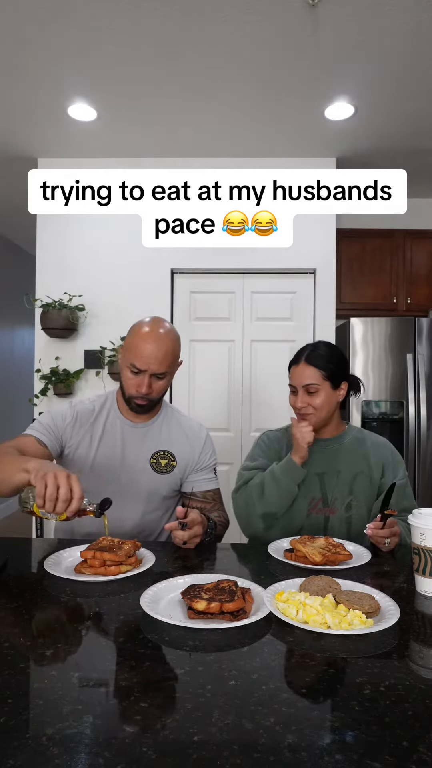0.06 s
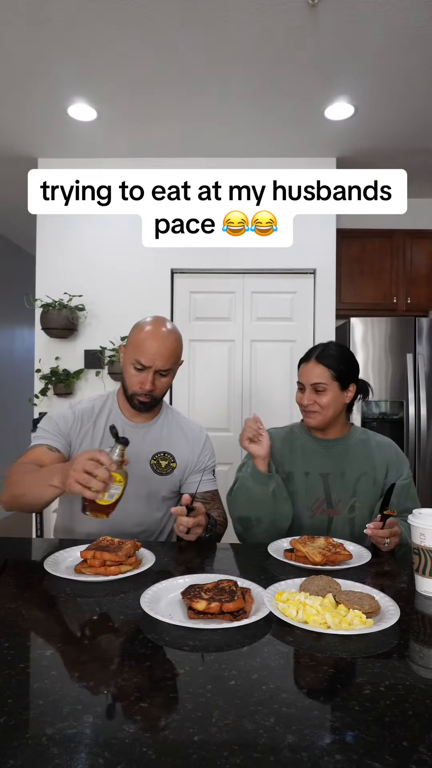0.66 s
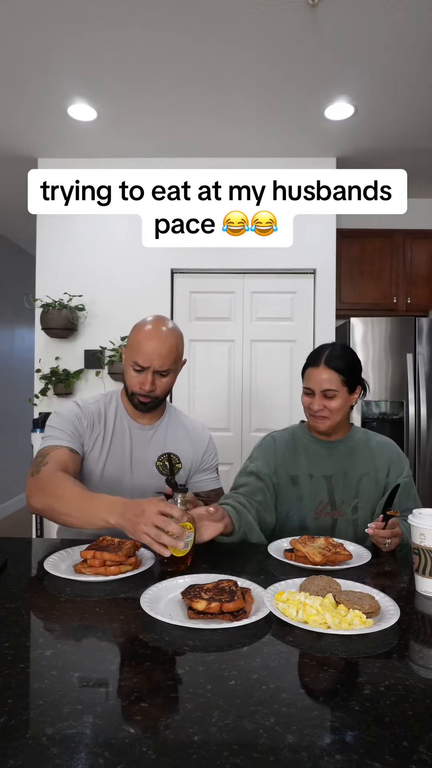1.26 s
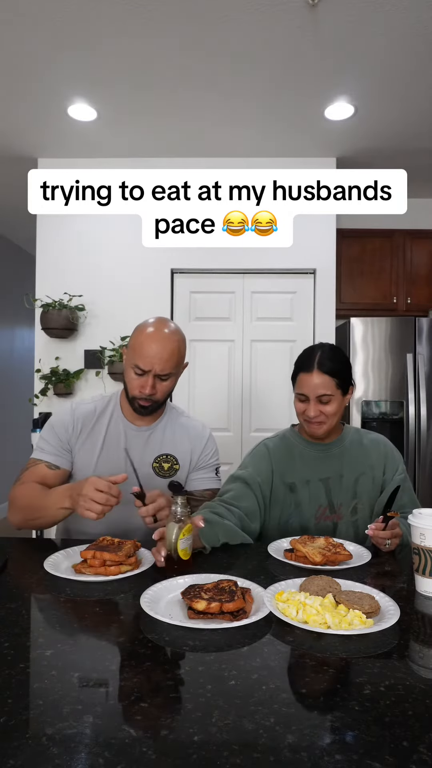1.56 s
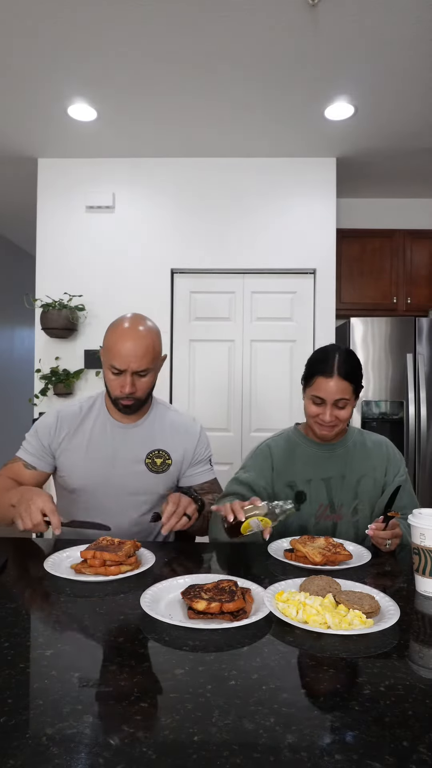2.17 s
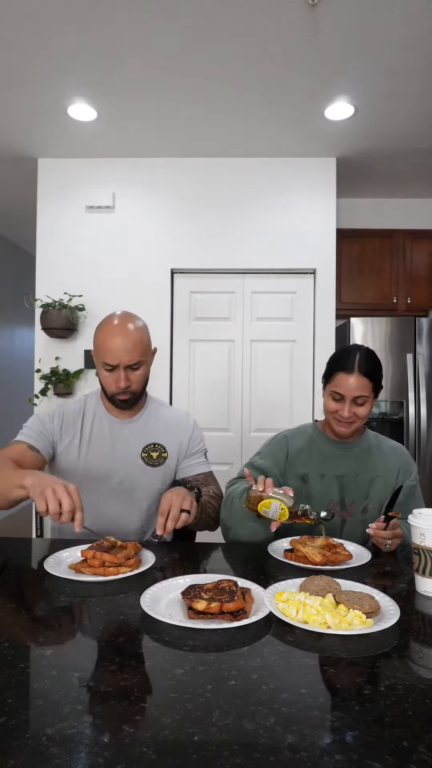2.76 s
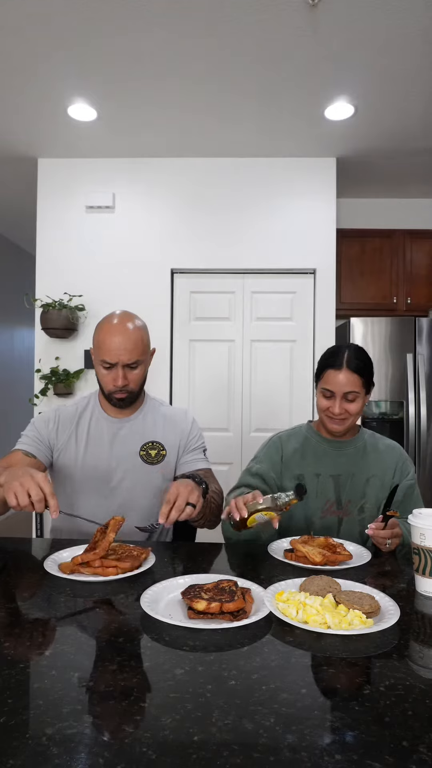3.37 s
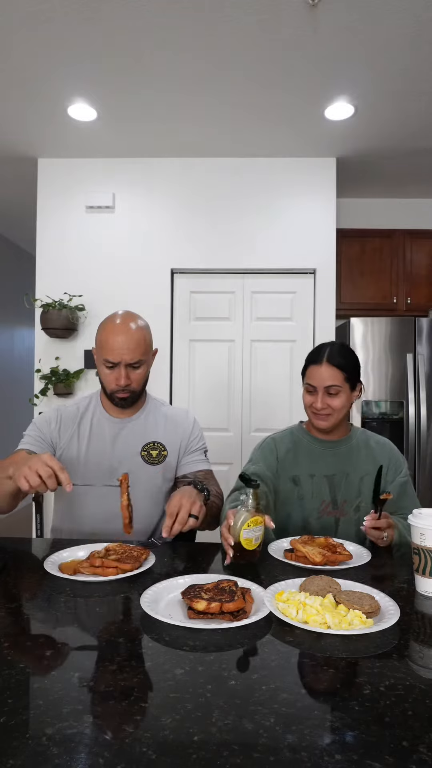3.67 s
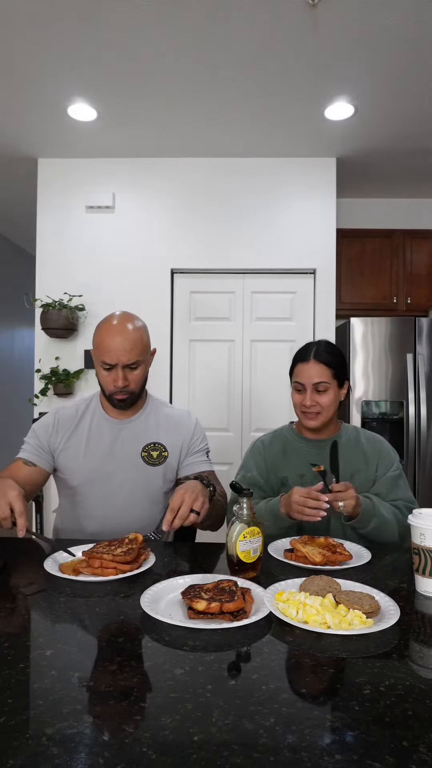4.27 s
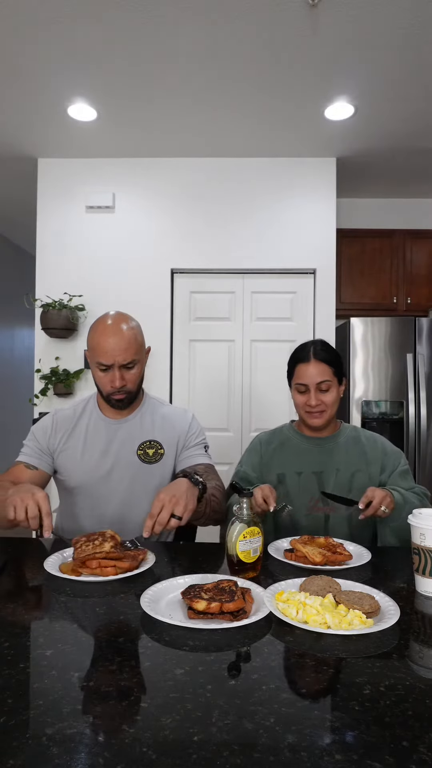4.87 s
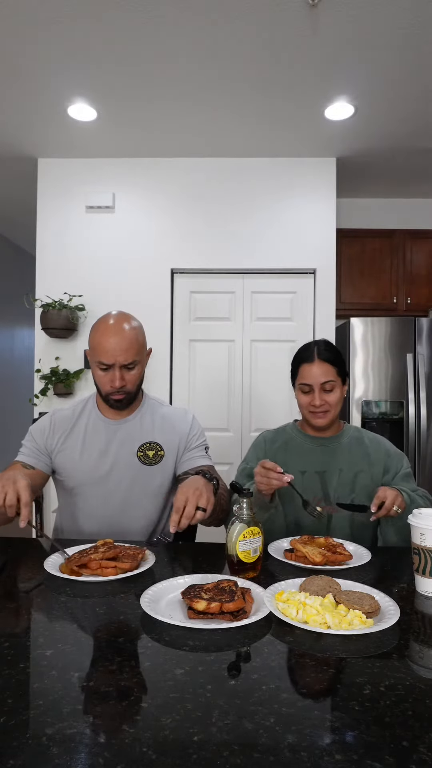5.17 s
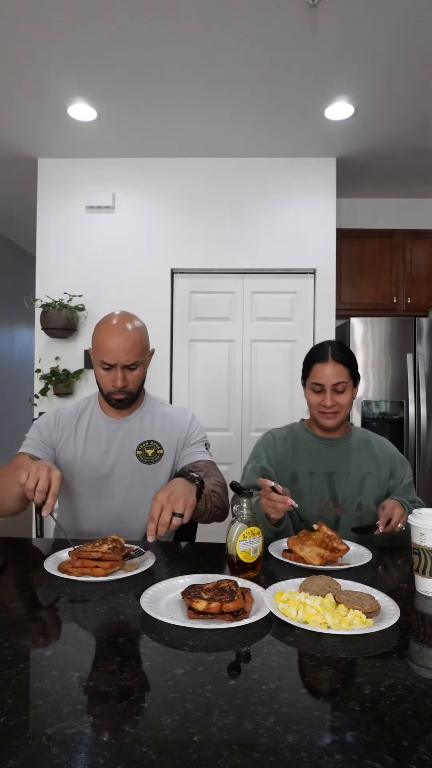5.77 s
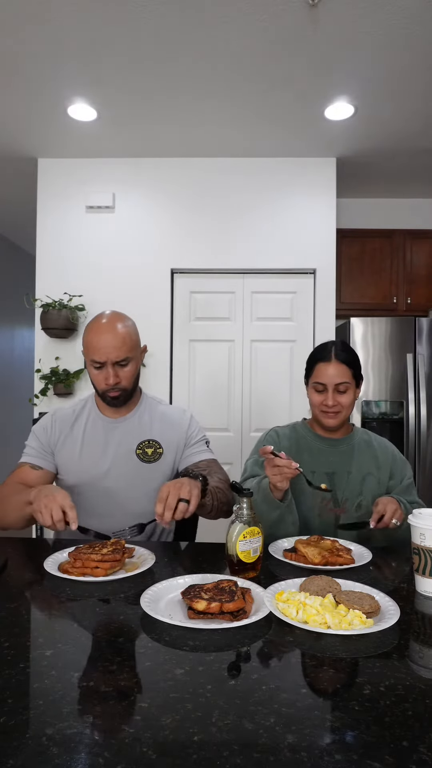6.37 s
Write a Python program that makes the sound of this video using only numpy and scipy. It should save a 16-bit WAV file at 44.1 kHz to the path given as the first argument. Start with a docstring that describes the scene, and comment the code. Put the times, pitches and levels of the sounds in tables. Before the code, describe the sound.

Knives and forks tap plates and each other between knocks of a glass bottle on a counter, over a soft appliance hum.

```python
"""A faint whistle and a few small ticks, then a glass syrup bottle knocks onto a stone counter and
judders across it in stick and slip. Air whistles softly in the spout as it pours; it lands again with
a rock. Two people are eating a step away: knife and fork rub and clink, tap food-damped plates and
saw through toast. An appliance hums under it all, and the hard kitchen gives each hit a bright tail."""
import sys
import numpy as np
from scipy import signal
from scipy.fft import rfft, irfft
from scipy.io import wavfile
from scipy.ndimage import uniform_filter1d, minimum_filter1d

SR = 44100
rng = np.random.default_rng(int(sys.argv[2]) if len(sys.argv) > 2 else 0)


def digitize_waveform(pressure):
    """Quantize a signal to 16-bit integers and store it at the path in sys.argv[1].

    Rows of a 2-D input are taken as channels; values are limited to [-1, 1].
    """
    field = np.atleast_2d(pressure).T
    bounded = np.clip(field, -1, 1)
    quanta = np.round(bounded * 32767).astype(np.int16)
    wavfile.write(sys.argv[1], SR, quanta)


N = 282681
TIME = np.arange(N) / SR

# Levels are relative, ahead of the room mix; brightness is a low-pass cutoff.
# the bottle's base lands on the stone: start_s, level_db, brightness_hz
BOTTLE_KNOCKS = [(1.1525, -9, 3080), (1.385, -6.5, 3630), (1.3955, -12, 2400), (1.4945, -14, 1270),
                 (1.554, -10, 1600), (1.574, -7.5, 3430), (1.688, -25, 1100), (1.7725, -17, 860),
                 (1.961, -35, 795), (3.8465, -11.5, 1010), (3.9245, -11.5, 1050), (3.941, -14, 1270),
                 (3.9845, -6, 4550), (3.990, -17.5, 2420), (4.008, -16, 1000)]
# shoves drag the bottle on its whole base: start_s, length_s, level_db, brightness_hz
BOTTLE_DRAGS = [(1.162, 0.086, -23, 2360), (1.383, 0.043, -23.5, 2520), (1.492, 0.019, -24, 1450),
                (1.553, 0.024, -24.5, 1610), (1.605, 0.046, -29.5, 1200), (3.852, 0.031, -34, 1160),
                (3.924, 0.04, -30.5, 1500), (3.984, .028, -23.5, 2200)]
# tilted, it skims on its rim: start_s, length_s, level_db, brightness_hz
RIM_SKIMS = [(1.675, 0.12, -31, 920)]
# the dead thud of bottle on counter: frequency_hz, level_db
THUD_SPECTRUM = [(40, -48), (110, -11.5), (220, 6), (310, -22), (450, -1.5), (900, 11), (1400, 5),
                 (2100, 2.5), (2800, -1), (3500, -9.5), (4400, -11.5), (6500, -24), (8000, -15),
                 (12000, -26), (16000, -6)]
# the ring of bottle and counter: pitch_hz, level_db, t60_s
BOTTLE_MODES = [(253, -30.5, 0.04), (421, -25.5, 0.063), (458.7, -25, 0.19), (645, -17, 0.019),
                (738, -39, 0.13), (886, -31.5, 0.027), (996, -34, 0.079), (1200, -44, 0.32),
                (1318, -21, 0.04), (1340, -24, 0.082), (1583, -23.5, 0.039), (1630, -20.5, 0.059),
                (1906, -28.5, 0.057), (1957, -27.5, 0.11), (3018, -29, 0.056), (5014, -27.5, 0.044),
                (6060, -37.5, 0.038)]
# the open cap ticks as the bottle is swung: start_s, level_db, brightness_hz
CAP_HITS = [(.6705, -51, 6400), (.7403, -51.5, 6000), (1.095, -54.5, 5050)]
# the cap's ring: pitch_hz, level_db, t60_s
CAP_MODES = [(2927, 10.5, 0.059), (4140, -4, 0.16), (4216, 1, 0.13), (6200, -4.5, 0.055)]
# air whistles through the spout during a pour: start_s, length_s, level_db, start_pitch_hz
POUR_WHISTLES = [(0, 0.07, -68, 2700), (2.549, 0.97, -70.5, 1714)]

# knife and fork tap a plate through food: start_s, level_db, brightness_hz
PLATE_TAPS = [(0.1442, -46, 6950), (1.8297, -12.5, 7350), (1.853, -40, 8100), (2.0608, -59, 5000),
              (3.353, -21.5, 2830), (3.3632, -17, 6400), (4.9306, -37, 3500), (4.993, -40, 2500),
              (5.21, -32.5, 4660), (5.4603, -28.5, 3500), (5.8542, -18.5, 8500), (6.1442, -18, 10500),
              (6.2904, -23.5, 3420), (6.311, -29, 7200), (6.3641, -29, 6360)]
# the dull click of a laden plate: frequency_hz, level_db
CLACK_SPECTRUM = [(80, -1), (250, 6.5), (600, 6.5), (950, 11.5), (1750, -3.5), (2400, 7.5), (4200, 2.5),
                  (6000, 0), (9000, -0.5), (12000, -6), (16000, -16.5)]
# the plates' ring, damped by food: pitch_hz, level_db, t60_s
PLATE_MODES = [(1010, -50, 0.012), (1393, -26, 0.038), (2350, -51, 0.039), (2540, -31, 0.024),
               (4070, -35, 0.018)]
# the knife saws through toast: start_s, length_s, level_db, brightness_hz
TOAST_CUTS = [(4.81, 0.072, -63, 12000), (4.95, 0.16, -69, 3500), (5.39, .05, -64.5, 6000),
              (5.455, 0.051, -55.5, 6500), (5.60, 0.094, -60, 4000), (6.145, 0.03, -68, 8000),
              (6.36, 0.052, -82, 4000)]
# the rasp of crumbling crust: frequency_hz, level_db
CRUST_SPECTRUM = [(40, -48), (200, -2), (700, -5), (1200, -1), (1750, -7.5), (2400, -1), (4000, -5.5),
                  (6000, -6.5), (9500, -3.5), (12000, -10), (16000, -28)]

# knife and fork strike each other: start_s, level_db, brightness_hz
STEEL_CLINKS = [(3.6717, -38.5, 13900), (3.971, -43, 15000), (4.4202, -41.5, 7450), (4.4467, -42, 7000),
                (4.492, -37.5, 5960), (4.5265, -20, 11400), (4.539, -33, 14000), (4.645, -38, 14100)]
# the crack of steel meeting steel: frequency_hz, level_db
SNAP_SPECTRUM = [(300, -98), (2000, -20), (3200, 7), (5000, -9), (9000, 3), (12000, -3), (16000, -25)]
# the ring of blade and tines: pitch_hz, level_db, t60_s
STEEL_MODES = [(3320, -4.5, 0.051), (3900, -5, 0.27), (4460, -4.5, 0.09), (4280, -1.5, 0.079),
               (4760, -11, 0.089), (4732, 6, 0.05), (5840, -15.5, 0.13), (6070, 0, 0.1), (8140, -5, 0.037),
               (7940, -0.5, 0.082), (10060, -1, 0.071), (10080, -5, 0.15), (11200, -7, .08),
               (11600, -11, .08), (11900, 1.5, 0.08), (13350, -25, .1), (14260, -4, .1), (15680, -22, .15)]
# the tines' lingering note: pitch_hz, level_db, t60_s
TINE_MODES = [(8650, 3, 0.37)]
# steel slides on steel: start_s, length_s, level_db, brightness_hz
STEEL_RUBS = [(1.66, 0.061, -47.5, 5200), (3.738, 0.033, -49.5, 9000), (3.905, 0.064, -50, 12000),
              (4.10, 0.024, -60.5, 15200)]
# the narrow squeaks of that slide: pitch_hz, level_db, width_hz
SQUEAK_BANDS = [(4226, -5, 240), (4675, -3.5, 130), (5300, 1, 360), (5960, 3, 25), (6250, -4, 150),
                (7700, -4.5, 50), (8130, -5, 36), (10000, -5, 340), (11140, -3.5, 100), (12080, 1, 100),
                (14200, -11, 110)]

# the steady air of the kitchen: frequency_hz, level_db
AIR_SPECTRUM = [(15, -49), (25, -40.5), (180, -8), (212, -2), (242, -8.5), (416, -10), (451, -13.5),
                (591, -18), (695, -20.5), (1400, -23), (2910, -29), (3620, -33), (4030, -30), (4740, -35),
                (16000, -47)]
# the appliance fan's hum: pitch_hz, level_db, width_hz
FAN_BANDS = [(210.9, -61.5, 1.65), (319.4, -65.5, 1.4), (365, -74, 16)]
# early reflections off counter, plates and people: delay_s, gain
EARLY_ECHOES = [(.0029, 0.44), (.0047, -0.2), (.0066, -0.24), (0.0116, -.2), (0.0162, -0.37)]
# how long the room's tail rings: frequency_hz, t60_s
TAIL_DECAY = [(150, 0.2), (400, .5), (1000, 0.6663), (2800, 0.7), (7000, 0.92), (14000, 0.36)]
# the tail's colour: frequency_hz, level_db
TAIL_SPECTRUM = [(150, 2), (500, -7), (1000, 1), (2000, 0.5), (5000, 2.5), (14000, -1)]
# stereo width of diffuse sound: frequency_hz, side_gain_db
STEREO_WIDTH = [(30, -29), (120, -22), (250, -19.5), (500, -13.5), (1000, -12), (2000, -8), (4000, -6),
                (14000, 0.5)]


def bottle(judder_hz=330, unevenness=0.45, spread_db=3.0, grit_db=-12):
    """Glass knocks on stone, then catches and slips as it is pushed; on its rim it loses the bass."""
    body = low_cut(ring(BOTTLE_MODES, click(THUD_SPECTRUM)), hz=78)
    catch_hz = judder_hz * np.exp(unevenness * wander(samples=120))
    catches = np.diff(np.floor(np.cumsum(catch_hz) / SR), prepend=0)  # one pulse a cycle
    catches *= amp(spread_db * rng.standard_normal(N))
    grit = amp(grit_db) * unit(slips(per_s=5000, spread_db=6.0))
    judder = signal.fftconvolve(unit(catches - catches.mean()) + grit, body)[:N]
    knocks = strike(BOTTLE_KNOCKS, body, chatter=0.76, chatter_s=0.0031)
    drags = stroke(BOTTLE_DRAGS, judder, rise=0.1, release=3.02)
    skims = stroke(RIM_SKIMS, low_cut(judder, hz=520) * rocking(), rise=0.084, release=4.84)
    return knocks + drags + skims


def rocking(rock_hz=38, depth_db=4, drift=0.196):
    """A loose tremolo: the bottle rocks on its rim, so the pressure comes and goes."""
    rate_hz = rock_hz * np.exp(drift * wander(samples=2000))
    return amp(depth_db * np.sin(2 * np.pi * np.cumsum(rate_hz) / SR))


def plates(settle_s=0.0063, settle_db=-6, settle_brightness=0.49):
    """Cutlery clacks on a laden plate, then settles with a softer, duller second touch."""
    body = low_cut(ring(PLATE_MODES, click(CLACK_SPECTRUM)), hz=116)
    settles = [(s + settle_s, db + settle_db, hz * settle_brightness) for s, db, hz in PLATE_TAPS]
    return strike(PLATE_TAPS + settles, body, chatter=1.93, chatter_s=0.0025)


def cutlery(contact_db=7, contact_t60_s=0.025, snap_db=9, tine_db=-30.5):
    """Steel on steel: a crack, a hard ring the hand damps at once, singing tines, squeaky slides."""
    free_ring = ring(STEEL_MODES, amp(snap_db) * click(SNAP_SPECTRUM))
    punch = 1 + amp(contact_db - 60 * TIME[:SR] / contact_t60_s)
    body = low_cut(free_ring * punch, hz=2350)
    tines = amp(tine_db) * strike(STEEL_CLINKS, ring(TINE_MODES), chatter=0.066, chatter_s=0.0024)
    squeak = unit(bands(slips(per_s=3500, spread_db=6.5), SQUEAK_BANDS))
    rubs = stroke(STEEL_RUBS, squeak, rise=0.65, release=2.8)
    return strike(STEEL_CLINKS, body, chatter=0.65, chatter_s=0.006) + tines + rubs


def cap():
    """Tiny ringing ticks of the cap against the bottle's neck."""
    return strike(CAP_HITS, low_cut(ring(CAP_MODES), hz=1500), chatter=1.0, chatter_s=0.008)


def toast():
    """Crust crumbles under the knife, a dry rasp with each stroke."""
    crumbs = shaped(slips(per_s=1500, spread_db=5.5), CRUST_SPECTRUM)
    return stroke(TOAST_CUTS, crumbs, rise=0.16, release=5.1)


def spout(flutter_hz=70, sag_per_s=0.2):
    """Air in the spout: a breathy whistle that swells and fades while its pitch sinks."""
    out = np.zeros(N)
    for start_s, length_s, db, hz in POUR_WHISTLES:
        progress = np.arange(0, 1, 1 / (length_s * SR))
        flutter = unit(soften(rng.standard_normal(N), flutter_hz))[:len(progress)]
        cycles = np.cumsum(hz * (1 - sag_per_s * length_s * progress)) / SR
        swell = np.sqrt(np.sin(np.pi * progress))
        add(out, start_s, amp(db) * swell * unit(flutter * np.sin(2 * np.pi * cycles)))
    return out


def room_tone(air_db=-56.5):
    """The bed: ventilation noise and the fan's wavering low tones."""
    mid, side = (amp(air_db) * unit(shaped(rng.standard_normal(N), AIR_SPECTRUM)) for _ in range(2))
    hum = bands(rng.standard_normal(N), FAN_BANDS)
    return widen(mid + hum, side)


def kitchen(dry, wet_db, early_db, pan_db):
    """Pans a source with its early reflections (positive is left) and adds the room's wide tail."""
    near = dry.copy()
    for delay_s, gain in EARLY_ECHOES:
        add(near, delay_s, amp(early_db) * gain * dry)
    far = signal.fftconvolve(dry[None], widen(tail(), tail()), axes=1)[:, :N]
    pan = amp(np.array([[pan_db], [-pan_db]]) / 2)
    return pan * near + amp(wet_db) * far


def tail(build_s=0.0067):
    """Dense wall reflections bloom quickly, each band dying at its own speed."""
    hz, t, noise = signal.stft(rng.standard_normal(SR), SR, nperseg=256)
    t60 = read(TAIL_DECAY, hz)[:, None]
    decay = amp(read(TAIL_SPECTRUM, hz)[:, None] - 60 * t / t60)
    equal_energy = np.sqrt(2 * np.log(1000) / (t60 * SR))
    bloom = 1 - np.exp(-(TIME[:SR] / build_s) ** 2)
    return signal.istft(noise * decay * equal_energy, SR, nperseg=256)[1][:SR] * bloom


def widen(mid, side):
    """Diffuse sound in stereo: nearly mono in the bass, wide in the treble."""
    side = shaped(side, STEREO_WIDTH)
    return np.array([mid + side, mid - side])


def strike(hits, body, chatter, chatter_s):
    """Plays hits on one resonant body; each contact chatters for a few milliseconds."""
    out, fade = np.zeros(N), np.exp(-TIME[:1024] / chatter_s)
    for start_s, db, brightness_hz in hits:
        force = chatter * rng.standard_normal(len(fade)) * fade / np.linalg.norm(fade)
        force[0] += 1  # the clean blow ahead of the chatter
        force /= np.linalg.norm(force)
        wave = soften(body, brightness_hz)
        add(out, start_s, amp(db) * signal.fftconvolve(wave / abs(wave).max(), force))
    return out


def stroke(strokes, friction, rise, release, db_per_octave=30):
    """Friction presses in, holds and dulls as it fades; rise and release (to -60 dB) are in lengths."""
    cutoffs_hz = np.geomspace(500, 16000, 6)
    shades = [unit(soften(friction, hz)) for hz in cutoffs_hz]
    out = np.zeros(N)
    for start_s, length_s, db, brightness_hz in strokes:
        span = slice(round(start_s * SR), round(start_s * SR) + SR)
        progress = (TIME[span] - start_s) / length_s
        fade_db = -60 * np.maximum(progress - 1, 0) / release
        cutoff_hz = brightness_hz * 2 ** (fade_db / db_per_octave)
        # crossfade between the two nearest shades of brightness
        blend = np.interp(cutoff_hz, cutoffs_hz, np.arange(len(shades)))
        rub = sum(np.sqrt(np.maximum(1 - abs(blend - k), 0)) * x[span] for k, x in enumerate(shades))
        out[span] += np.clip(progress / rise, 0, 1) * amp(db + fade_db) * rub
    return out


def ring(modes, transient=(0,)):
    """One second of a struck body: dying modes under an optional transient."""
    t = TIME[:SR]
    wave = sum((-1) ** k * amp(db - 60 * t / t60) * np.sin(2 * np.pi * hz * t)
               for k, (hz, db, t60) in enumerate(modes))
    add(wave, 0, transient)
    return wave


def click(spectrum, size=4096):
    """A minimum-phase transient of peak 1 with the given spectrum."""
    log_gain = np.log(amp(read(spectrum, abs(np.fft.fftfreq(size, 1 / SR)))))
    wave = np.fft.ifft(np.exp(np.conj(signal.hilbert(log_gain)))).real
    return wave / abs(wave).max()


def slips(per_s, spread_db):
    """Stick and slip: randomly timed catches of uneven size."""
    catches = (rng.random(N) < per_s / SR) * rng.choice([-1, 1], N)
    return catches * amp(spread_db * np.minimum(rng.exponential(1, N), 3))


def wander(samples):
    """Smoothed random drift of rms 1."""
    return unit(uniform_filter1d(rng.standard_normal(N), size=samples))


def bands(noise, peaks):
    """Noise sings in narrow resonances, each at its own level."""
    hz, spectrum = np.fft.rfftfreq(N, 1 / SR), rfft(noise)
    return sum(amp(db) * unit(irfft(spectrum / (1 + ((hz - centre) / width) ** 2), N))
               for centre, db, width in peaks)


def soften(x, hz):
    """Low-pass: a softer contact lasts longer and loses the treble."""
    return signal.lfilter(*signal.butter(2, min(hz, 0.45 * SR), fs=SR), x)


def low_cut(x, hz):
    """High-pass: small objects radiate little bass."""
    return signal.sosfilt(signal.butter(3, hz, "high", fs=SR, output="sos"), x)


def shaped(x, curve):
    """Applies an EQ curve."""
    return irfft(rfft(x) * amp(read(curve, np.fft.rfftfreq(len(x), 1 / SR))), len(x))


def read(curve, hz):
    """Reads a curve on a log-frequency axis."""
    points_hz, values = np.transpose(curve)
    return np.interp(np.log(hz + 1), np.log(points_hz + 1), values)


def add(mix, start_s, sound):
    """Drops a sound into the mix."""
    part = mix[max(round(start_s * SR), 0):][:len(sound)]
    part += sound[:len(part)]


def amp(db):
    """Decibels to gain."""
    return 10 ** (np.asarray(db) / 20)


def unit(x):
    """Scales to rms 1."""
    return x / np.sqrt(np.mean(x ** 2) + 1e-20)


def scene():
    """Bottle, plates and cutlery in the humming kitchen."""
    syrup = kitchen(bottle() + cap() + spout(), wet_db=-1.0, early_db=-7, pan_db=-1.7)
    meal = kitchen(toast() + plates(), wet_db=0.5, early_db=-4.5, pan_db=0.5)
    steel = kitchen(cutlery(), wet_db=-1.5, early_db=6.5, pan_db=-2.5)
    return syrup + meal + steel + room_tone()


def record(dry):
    """A fast limiter holds down the hardest knocks; a steep low-pass trims the very top."""
    ceiling, window_samples, top_hz = 0.38, 177, 15800
    gain = np.minimum(1, ceiling / (abs(dry).max(0) + 1e-9))
    limited = dry * uniform_filter1d(minimum_filter1d(gain, window_samples), window_samples)
    low_pass = signal.firwin(511, top_hz, window=("kaiser", 9), fs=SR)
    return signal.oaconvolve(limited, low_pass[None], "same")


dry = scene()
out = record(dry)
digitize_waveform(out)
```